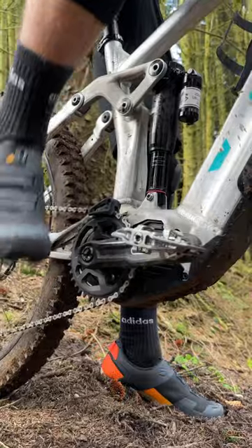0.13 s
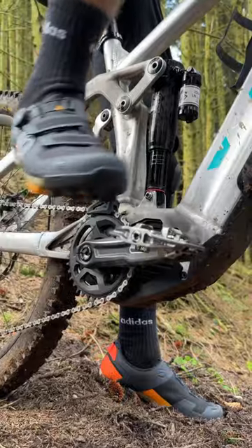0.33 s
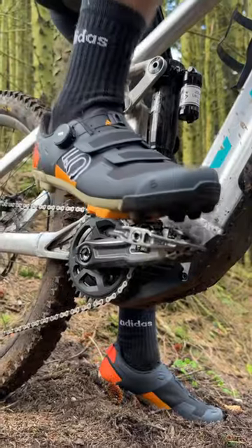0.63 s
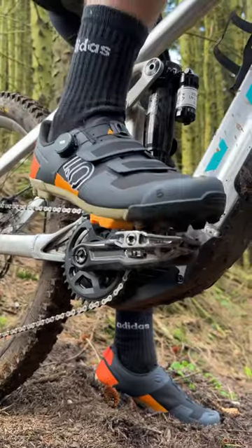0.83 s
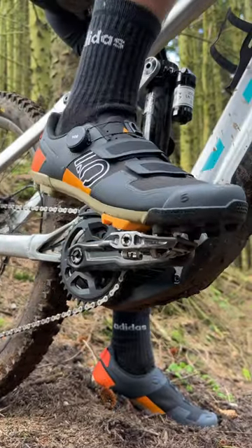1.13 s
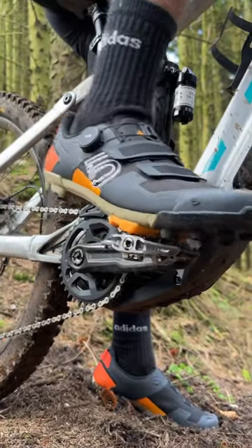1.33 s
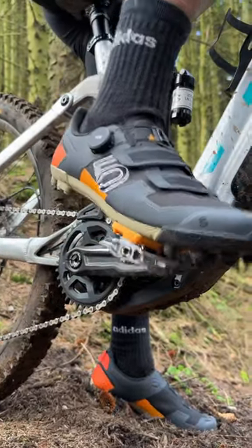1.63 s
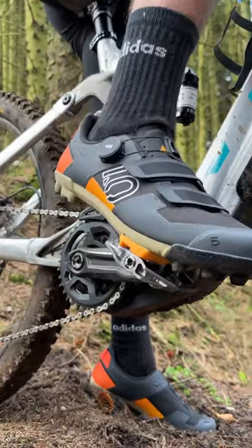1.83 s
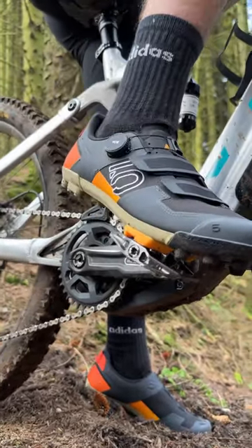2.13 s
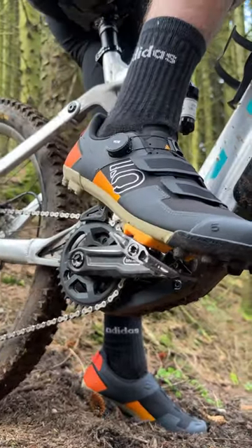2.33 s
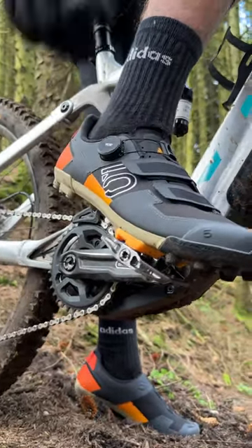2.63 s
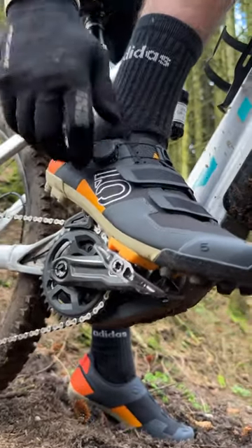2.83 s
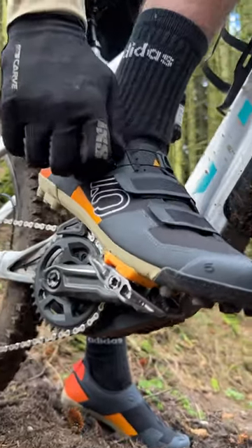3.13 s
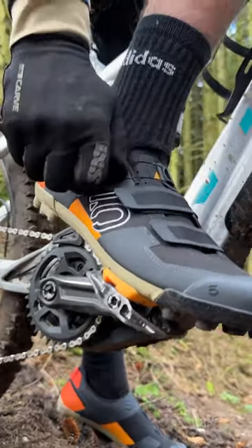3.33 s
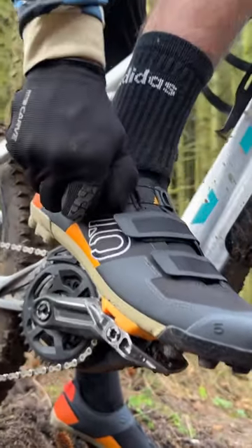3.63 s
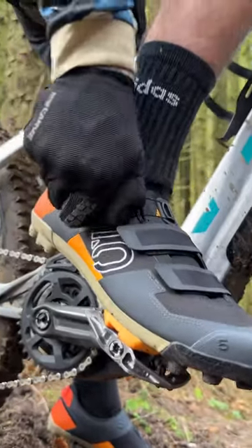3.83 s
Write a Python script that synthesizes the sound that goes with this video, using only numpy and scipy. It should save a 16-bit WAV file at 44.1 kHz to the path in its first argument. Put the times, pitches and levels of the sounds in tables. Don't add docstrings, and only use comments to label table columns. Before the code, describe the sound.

A shoe clacks and grates on a bike pedal, clips in hard, then a dial ratchets

```python
import sys
import numpy as np
from scipy import signal
from scipy.fft import rfft, irfft
from scipy.io import wavfile
from scipy.ndimage import uniform_filter1d

SR = 44100
rng = np.random.default_rng(int(sys.argv[2]) if len(sys.argv) > 2 else 0)


def digitize_waveform(pressure):
    field = np.atleast_2d(pressure).T
    bounded = np.clip(field, -1, 1)
    quanta = np.round(bounded * 32767).astype(np.int16)
    wavfile.write(sys.argv[1], SR, quanta)


def undo_db(level):
    steps = np.asarray(level, float) / 20
    return 10 ** steps


N = 176400
TIME_S = np.arange(N) / SR


def cut(x, hz, kind="low"):
    return signal.sosfilt(signal.butter(2, hz, kind, fs=SR, output="sos"), x)


def colour(x, points):
    hz, db = np.array(points).T
    log_hz = np.log(np.arange(N // 2 + 1) * SR / N + 1)
    return irfft(rfft(x) * undo_db(np.interp(log_hz, np.log(hz), db)), N)


def unit(x):
    return x / np.sqrt(np.mean(x ** 2))


def walk(rate_hz):
    hold = int(SR / rate_hz)
    steps = np.repeat(rng.standard_normal(N // hold + 1), hold)
    smooth = uniform_filter1d(uniform_filter1d(steps, hold), hold)
    return unit(smooth[:N])


def place(rows, shapes):
    out = np.zeros((len(rows[0]) - 1, N + shapes.shape[1]))
    for row, shape in zip(rows, shapes):
        i = int(row[0] * SR)
        out[:, i:i + len(shape)] += undo_db(row[1:])[:, None] * shape
    return out[:, :N]


def swell(start_s, length_s):
    rise_share = 0.26
    u = np.clip((TIME_S - start_s) / length_s, 0, 1)
    return np.sin(np.pi * u ** (np.log(.5) / np.log(rise_share)))


def ring(x, modes, pan_db=0):
    spread_db = 7
    out = 0
    for k, (hz, db, t60_s) in enumerate(modes):
        r = np.exp(-np.log(1000) / (t60_s * SR))
        w = 2 * np.pi * hz / SR
        lean_db = (pan_db + spread_db * (-1) ** k) * np.array([[.5], [-.5]])
        note = signal.lfilter([.5, 0, -.5], [1, -2 * r * np.cos(w), r * r], x)
        out = out + undo_db(db + lean_db) * note
    return out


# pitch_hz [Hz], level_db [dB per Hz]
FOREST_SPECTRUM = [(25, -26.5), (52, 2.5), (95, -5.5), (200, -18), (1400, -34.5), (2350, -31), (3200, -38),
                   (16000, -52)]


def forest():
    level_db, last_db, alike_hz = -59, -1.5, 3500
    out = 0
    f = np.arange(N // 2 + 1) * SR / N + 1
    mid, side = (rfft(colour(rng.standard_normal(N), FOREST_SPECTRUM)) for _ in range(2))
    width = np.minimum(f / alike_hz + 0.064, .6)
    for hz in 30 * 2. ** np.arange(10):
        band = np.cos(np.pi / 2 * np.clip(np.log2(f / hz), -1, 1)) ** 2
        m = irfft(mid * band, N)
        s = irfft(side * band * width, N)
        out = out + undo_db(0.59 * walk(30)) * np.array([m + s, m - s])
    late = np.clip(TIME_S - 2.6, 0, .6) / 0.4
    return unit(out) * undo_db(level_db + last_db * late)


def drone():
    pitch_hz = 50.6 * (1 + 0.013 * walk(45))
    return undo_db(-63.5 + 2.3 * walk(6)) * np.sin(2 * np.pi * np.cumsum(pitch_hz) / SR)


def trees(x):
    echo_db, t60_s, low_cut_hz = -31.5, 0.2, 250
    t = np.arange(SR) / SR
    noise = rng.standard_normal((2, SR)) * undo_db(-60 * t / t60_s) * np.minimum(t / 0.0033, 1)
    tail = noise[0] + 1.4 * noise[1] * np.array([[1], [-1]])
    tail = tail / np.sqrt(np.sum(tail[0] ** 2))
    sent = cut(x.mean(axis=0), low_cut_hz, "high")[None]
    return undo_db(echo_db) * signal.fftconvolve(sent, tail)[:, :N]


# time_s [s], level_db [dB]
GLOVE_LEVEL = [
    (2.351, -97),
    (2.6, -75),
    (2.79, -73.5),
    (2.85, -68),
    (2.921, -71.5),
    (2.989, -68),
    (3.1, -72.5),
    (3.399, -70.5),
    (3.803, -67),
    (4, -70.5),
]
# pitch_hz [Hz], level_db [dB per Hz]
CLOTH_SPECTRUM = [(400, -1.5), (2300, 0.5), (3800, -5), (5500, -4.5), (9000, -10), (17000, -27.5)]
# start_s [s], end_s [s], level_db [dB]
SPOOL_HISS = (3.29, 3.94, -71)


def glove():
    time_s, level_db = np.array(GLOVE_LEVEL).T
    mid, side = (unit(colour(rng.standard_normal(N), CLOTH_SPECTRUM)) for _ in range(2))
    both = np.array([mid + 0.34 * side, mid - 0.47 * side])
    patches = 0
    for k, band_hz in enumerate([(500, 2500), (2500, 6000), (6000, 16500)]):
        flicker = undo_db(2.5 * walk(9) + 1.5 * walk(50))
        patches = patches + flicker * (-1) ** k * cut(both, band_hz, "band")
    start_s, end_s, spool_db = SPOOL_HISS
    turning = uniform_filter1d(1. * (TIME_S > start_s) * (TIME_S < end_s), size=1500)
    hiss = undo_db(spool_db) * turning * cut(rng.standard_normal(N), 4000, "high")
    return undo_db(np.interp(TIME_S, time_s, level_db, -110)) * patches + hiss


# pitch_hz [Hz], level_db [dB], t60_s [s]
GROAN_MODES = [(206.9, -9, 0.36), (371.8, -1.5, 0.15), (431.7, -1, 0.16), (506, 0, .15),
               (644.2, -7.5, 0.24), (790, -10, 0.04)]
# time_s [s], level_db [dB]
SETTLING_LEVEL = [
    (1.36, -65),
    (1.39, -49.5),
    (1.52, -65),
    (1.66, -81),
    (1.701, -41.5),
    (1.85, -50.5),
    (2.1, -58),
    (2.17, -55),
    (2.3, -63.5),
    (2.751, -72),
]


def groan():
    time_s, level_db = np.array(SETTLING_LEVEL).T
    slips = unit(rng.standard_normal(N) * undo_db(3.1 * walk(30)))
    load = undo_db(np.interp(TIME_S, time_s, level_db, -120, -120))
    return 0.029 * ring(slips * load, GROAN_MODES)


# time_s [s], pitch_hz [Hz], level_db [dB], t60_s [s]
LOOSE_PARTS = [(.7238, 3343, -23.5, 0.018), (.9445, 705, -34, 0.041), (1.1066, 3210, -36.5, 0.013),
               (1.1066, 6800, -51.5, 0.036), (1.1066, 1470, -27, 0.034), (1.3225, 1550, -15, .012),
               (1.3227, 4280, -20, 0.011), (1.327, 363, -24, 0.033), (1.664, 2450, -13, 0.012),
               (1.674, 2420, -29, 0.067), (1.704, 222, -26, 0.058), (1.738, 236, -28.5, 0.086),
               (1.784, 2200, -35, 0.017), (1.798, 2180, -37, .015), (1.813, 2150, -34, 0.018),
               (1.899, 583, -40, 0.055), (1.902, 790, -43, 0.045), (2.14, 220, -42, 0.12),
               (2.143, 700, -52, 0.12), (2.143, 434, -45.5, 0.13), (2.219, 1114, -42, 0.051),
               (2.219, 665, -38.5, 0.044), (2.219, 7080, -40, 0.011), (1.936, 6560, -47, 0.019),
               (2.496, 1001, -57, 0.044)]


def pings():
    out = np.zeros(N + 8192)
    t = np.arange(8192) / SR
    for time_s, hz, db, t60_s in LOOSE_PARTS:
        i = int(time_s * SR)
        decay = undo_db(db - 60 * t / t60_s) * np.minimum(t / 0.00033, 1)
        out[i:i + len(t)] += decay * np.sin(2 * np.pi * hz * t)
    return out[:N]


# time_s [s], rate_per_s [slips/s], level_db [dB]
LACE_SLIPS = [
    (3.5, 145, -72),
    (3.534, 160, -53),
    (3.61, 78, -54),
    (3.638, 104, -48),
    (3.699, 75, -49.5),
    (3.741, 91, -48.5),
    (3.82, 62, -48),
    (3.87, 110, -46.5),
    (3.93, 60, -58),
]
# pitch_hz [Hz], level_db [dB], t60_s [s]
LACE_MODES = [(700, -3, .007), (1200, 0, .006), (2000, -2, .005)]


def lace():
    time_s, rate_per_s, level_db = np.array(LACE_SLIPS).T
    rate = np.interp(TIME_S, time_s, rate_per_s) * (1 + 0.073 * walk(90))
    slips = np.diff(np.floor(np.cumsum(rate) / SR), prepend=0)
    level = undo_db(np.interp(TIME_S, time_s, level_db, -120, -120) + 3 * walk(90) - 2)
    return ring(cut(slips * level, 2500), LACE_MODES)


# time_s [s], level_db [dB]
PAWL_CLICKS = [(3.3088, -1.5), (3.3093, -8), (3.3097, -3.5), (3.3895, -20), (3.39, -0.5), (3.3903, -13),
               (3.5089, -2.5), (3.5094, -25), (3.5101, -8), (3.6159, -7.5), (3.6181, -9.5), (3.6264, -7),
               (3.7129, -8), (3.7204, -9), (3.7317, -8.5), (3.8287, -6.5), (3.8382, -10), (3.851, -9.5)]
# pitch_hz [Hz], level_db [dB]
DIAL_SPECTRUM = [(850, -26.5), (1500, -7), (2000, -3), (2700, -10.5), (4800, -7.5), (9000, -1.5),
                 (15000, -3), (16600, -17)]


def dial():
    level_db, side_db, pawl_t60_s = 1, -10, 0.0017
    buzz_db, buzz_t60_s = -17, .02
    t = np.arange(2048) / SR
    decay = undo_db(-60 * t / pawl_t60_s) + undo_db(buzz_db - 60 * t / buzz_t60_s)
    snap = rng.standard_normal((len(PAWL_CLICKS), len(t))) * decay
    snap = snap / np.abs(snap).max(axis=1, keepdims=True)
    mid = colour(place(PAWL_CLICKS, snap)[0], DIAL_SPECTRUM)
    side = undo_db(side_db) * np.roll(cut(mid, [6000, 11000], "bandstop"), shift=3)
    return undo_db(level_db) * np.array([mid + side, mid - side])


# start_s [s], length_s [s], pitch_hz [Hz], level_db [dB]
SQUEALS = [(.958, .05, 1570, -41), (.968, .038, 760, -45), (.882, .06, 690, -51), (.92, .04, 3230, -52),
           (1.336, .006, 1680, -29), (1.3465, .019, 585, -21), (1.3465, .019, 800, -21),
           (1.657, .014, 6200, -25), (1.698, .033, 705, -32), (1.742, .04, 700, -39),
           (1.735, .03, 2220, -47), (1.785, .04, 985, -42), (1.7, .07, 1360, -46)]


def squeals():
    shake_db = 3 * walk(200)
    turns = np.cumsum(1 + 0.006 * walk(150)) / SR
    out = 0
    for start_s, length_s, hz, db in SQUEALS:
        out = out + undo_db(db + shake_db) * swell(start_s, length_s) ** .5 * np.sin(2 * np.pi * hz * turns)
    return out


# start_s [s], length_s [s], sole_db [dB], body_db [dB], spring_db [dB]
SCRAPE_EVENTS = [(0.716, 0.065, -50, -45.5, -56), (0.88, 0.19, -56.5, -57, -74),
                 (0.925, 0.1, -45.5, -40.5, -52), (1.089, 0.03, -56, -56, -91),
                 (1.306, 0.051, -51, -43.5, -55), (1.323, 0.056, -34.5, -33.5, -46.5),
                 (1.357, 0.069, -48.5, -50.5, -68.5), (1.622, 0.069, -58, -52, -58.5),
                 (1.651, 0.036, -35, -25.5, -36), (1.669, 0.041, -41.5, -35.5, -44),
                 (1.684, 0.15, -40.5, -45.5, -55.5), (1.779, 0.059, -46.5, -65, -64),
                 (1.783, 0.22, -52, -63, -66), (1.966, 0.35, -71.5, -73, -81.5),
                 (2.123, 0.22, -70, -64.5, -66), (2.223, 0.4, -76.5, -85, -85)]


def scrapes():
    grit_per_s, grit_db = 7400, 3
    ticks = (rng.random(N) < grit_per_s / SR) * rng.standard_normal(N)
    grit = unit(ticks * undo_db(grit_db * rng.exponential(size=N)))
    uneven = undo_db(2.2 * walk(70))
    strokes = sum(undo_db(db)[:, None] * swell(start_s, length_s) for start_s, length_s, *db in SCRAPE_EVENTS)
    return 0.096 * grit * uneven * strokes


# time_s [s], frame_db [dB], sole_db [dB], body_db [dB], spring_db [dB]
KNOCK_EVENTS = [(.7238, -34, -27, -29, -25.5), (.8938, -80, -60, -58, -55), (.9083, -80, -55, -52, -52),
                (.9272, -70, -45, -45, -48), (.9535, -70, -40, -40, -48), (.9445, -67, -28.5, -31.5, -39),
                (.976, -70, -50, -48, -42), (.998, -42.5, -41, -49, -37.5),
                (1.1066, -40.5, -28, -36.5, -47.5), (1.2255, -97, -74.5, -61, -51),
                (1.243, -63, -53.5, -59.5, -55), (1.3225, -30, -22, -26, -19),
                (1.347, -21.5, -22, -25, -24.5), (1.358, -22, -22, -33, -24), (1.389, -32, -47.5, -42, -54),
                (1.639, -57, -62.5, -47.5, -44), (1.664, -17, -29, -24, -6.5),
                (1.894, -73, -45, -49, -51.5), (1.899, -68, -46, -40, -40.5),
                (1.936, -63.5, -48.5, -48, -52.5), (2.0185, -73, -65, -58, -37.5),
                (2.14, -44, -41, -50, -65.5), (2.196, -72, -54, -48, -48), (2.219, -57, -46, -44, -23.5)]
# time_s [s], body_db [dB], spring_db [dB]
TAP_EVENTS = [(1.963, -59, -78), (1.99, -57.5, -63), (2.031, -51, -48), (2.077, -50, -52),
              (2.112, -55.5, -77), (2.496, -63, -85.5), (2.713, -61, -75), (3.161, -58, -45),
              (3.242, -60.5, -71), (3.248, -51, -69), (3.272, -48.5, -44), (3.79, -75, -46.5)]


def knocks():
    chatter_s, frame_late_s, tap_sole_db = 0.0021, 0.0065, -8
    taps = [(s, -99, body + tap_sole_db, body, spring) for s, body, spring in TAP_EVENTS]
    rows = KNOCK_EVENTS + taps
    t = np.arange(2048) / SR
    envelope = np.exp(-t / chatter_s) * np.minimum(t / 0.0004, 1)
    chatter = rng.standard_normal((len(rows), len(t))) * envelope
    hits = place(rows, chatter / np.sqrt(np.sum(chatter ** 2, axis=1, keepdims=True)))
    late = [(s + frame_late_s, frame_db) for s, frame_db, *_ in rows]
    push = place(late, np.ones((len(rows), 1)))[0]
    return hits, push


FRAME_MODES = [(86, -16, 0.23), (142.2, -2, 0.17), (234.7, -2, 0.069)]
TUBE_MODES = [(350, -7, 0.027), (428, -7, 0.028)]
SOLE_MODES = [(616, -8, 0.037), (664, -2.5, 0.024), (783.4, -5.5, 0.018), (1072, 1, 0.0093),
              (1515, -8.5, 0.019)]
BODY_MODES = [(1319, -1, 0.012), (2202, 2.5, 0.011), (2483, 2, 0.0062), (3153, 0, 0.0076),
              (4000, -16.5, 0.039)]
SPRING_MODES = [(6250, -12, .012), (6850, -14, .018), (9750, -18, .022), (11600, -18, .014)]
EDGE_MODES = [(6900, -14, .02), (11600, -6, .025), (15400, -12, .012)]


def pedal():
    frame_rub_db, push_hz, shoe_pan_db = -7.5, 192, 5
    crack_db, crack_hz, rasp_db = 14.5, 3720, -10.5
    clamped_s, clamped_hz = 1.75, 11000
    (_, hit_sole, hit_body, hit_spring), push = knocks()
    rub_sole, rub_body, rub_spring = scrapes()
    frame = ring(cut(push + undo_db(frame_rub_db) * rub_sole, push_hz), FRAME_MODES).mean(axis=0)
    tubes = ring(rub_sole, TUBE_MODES)
    sole = ring(cut(hit_sole + rub_sole, [520, 2000], "band"), SOLE_MODES, shoe_pan_db)
    body = ring(cut(hit_body + .5 * rub_body, 6000), BODY_MODES)
    spring = ring(hit_spring + rub_spring / 4, SPRING_MODES)
    edges = ring(rub_spring * swell(0.87, .2), EDGE_MODES)
    metal = hit_spring + 4 * cut(rub_spring, 7800)
    rasp = cut(hit_body + 3 * rub_body, [1200, 4500], "band")
    crack = cut(metal, crack_hz, "high") + undo_db(rasp_db) * rasp
    dull = cut(cut(crack, clamped_hz), clamped_hz)
    crack = np.where(TIME_S < clamped_s, crack, dull)
    return frame + tubes + sole + body + spring + undo_db(crack_db) * crack + squeals() + edges


def scene():
    near = pedal() + dial() + lace() + pings()
    return near + trees(near) + glove() + forest() + drone() + groan()


def low_pass(x):
    return signal.sosfilt(signal.butter(12, 17170, fs=SR, output="sos"), x)


def record(dry):
    top_hz, start_s = 16600, 0.035
    heard = signal.sosfilt(signal.ellip(8, .2, 70, top_hz, fs=SR, output="sos"), dry)
    opening = np.clip((TIME_S - start_s) / 0.0031 + 1, 0, 1)
    return low_pass(heard * opening)


dry = scene()
out = record(dry)
digitize_waveform(out)
```